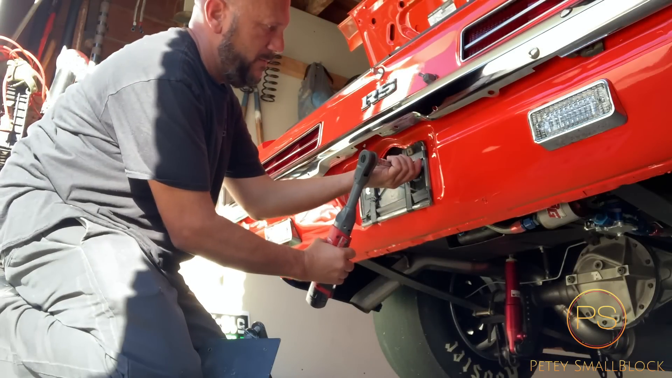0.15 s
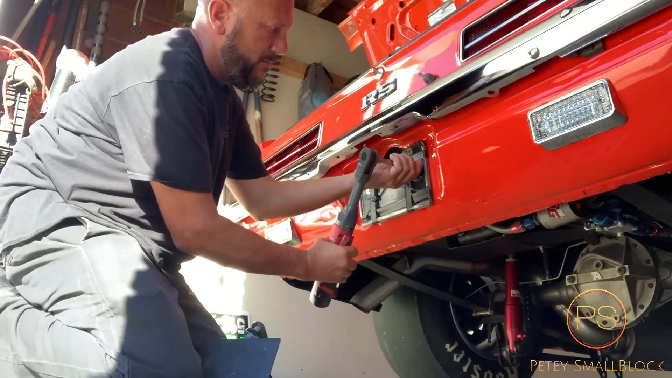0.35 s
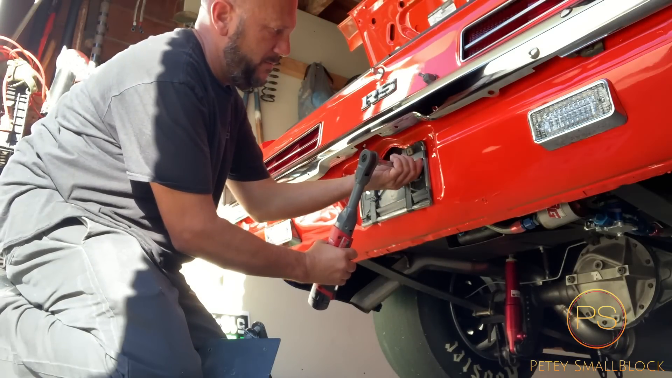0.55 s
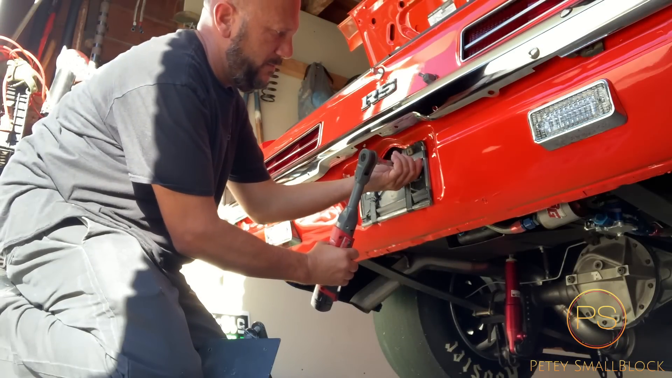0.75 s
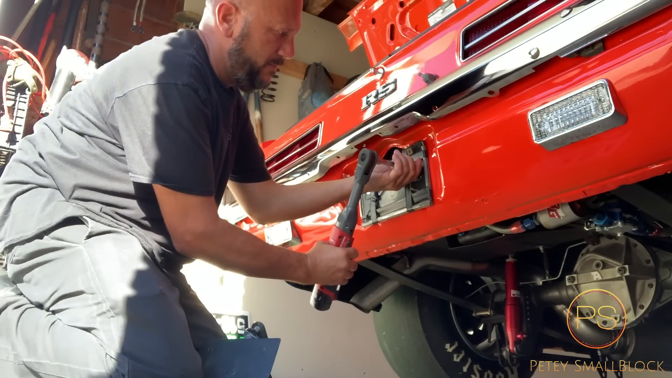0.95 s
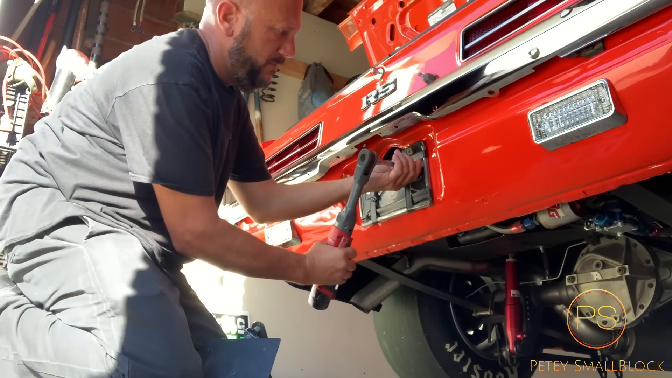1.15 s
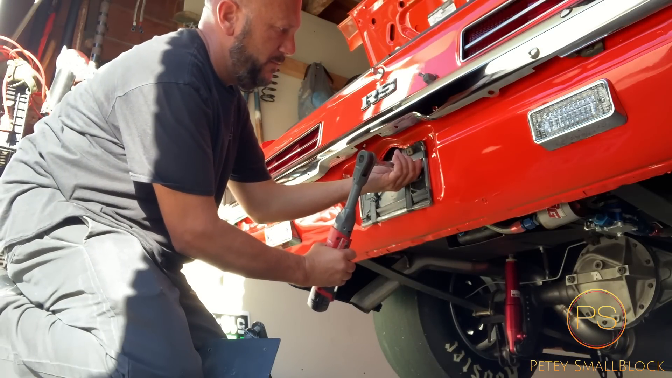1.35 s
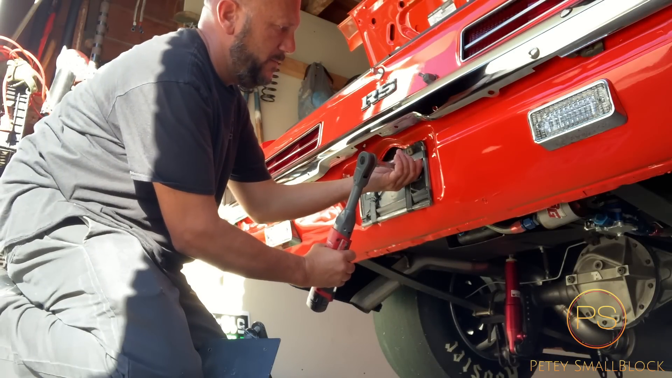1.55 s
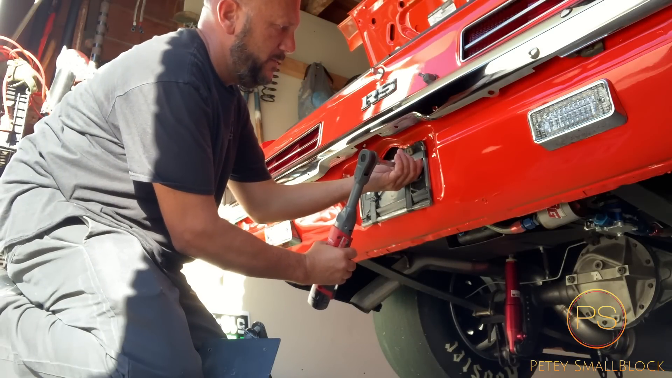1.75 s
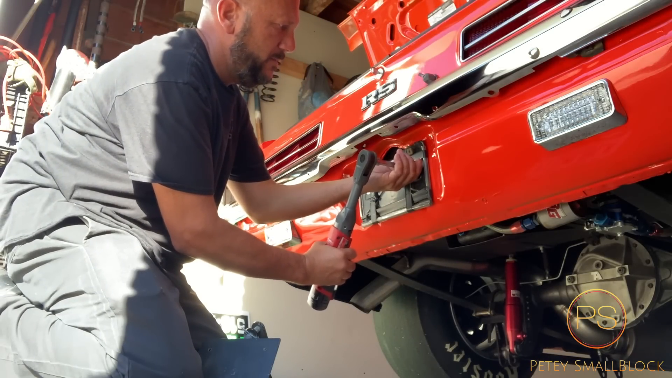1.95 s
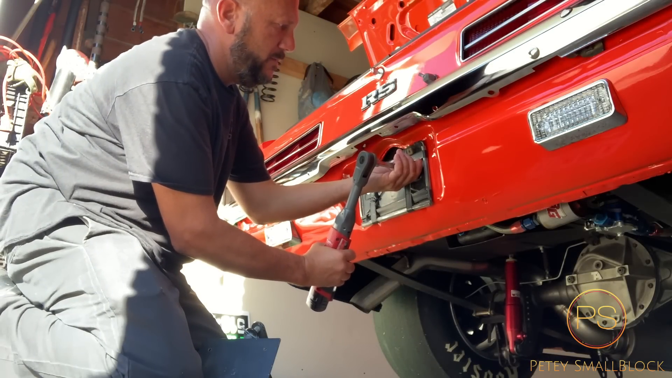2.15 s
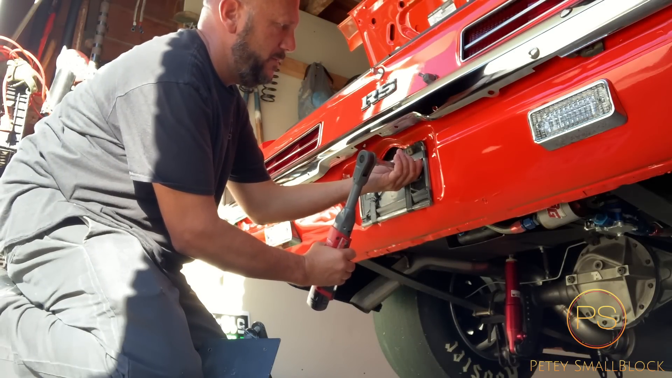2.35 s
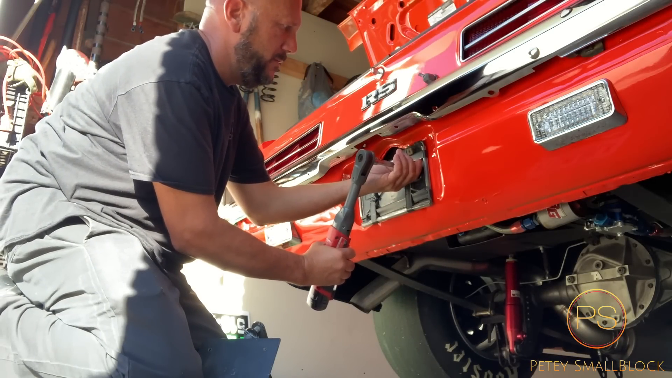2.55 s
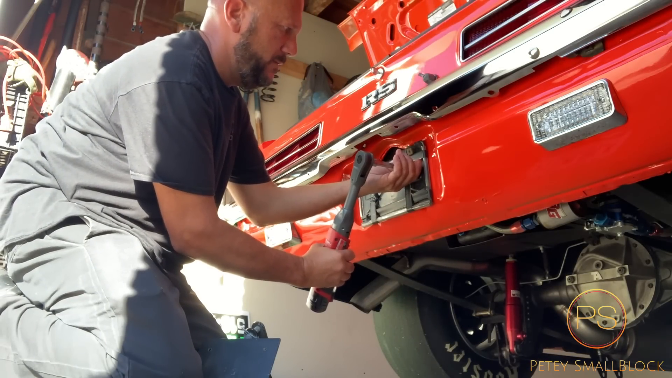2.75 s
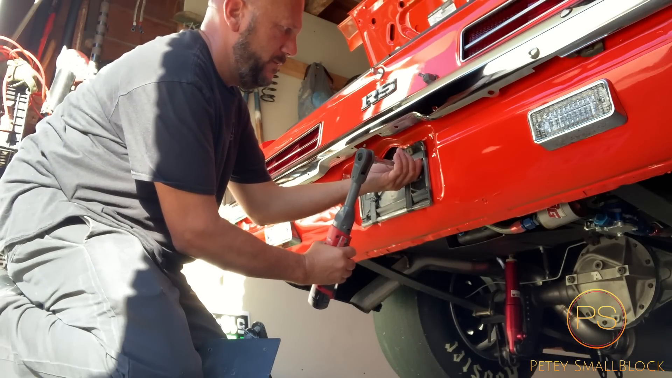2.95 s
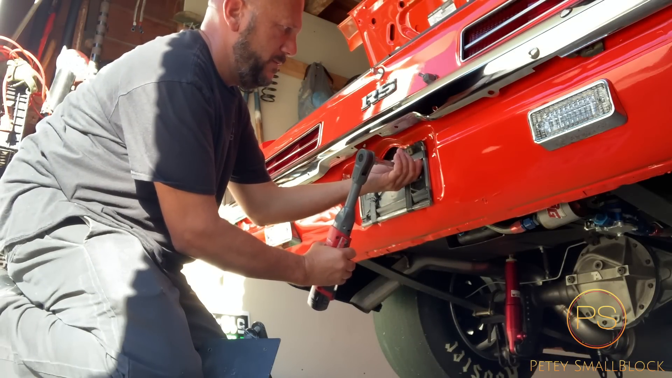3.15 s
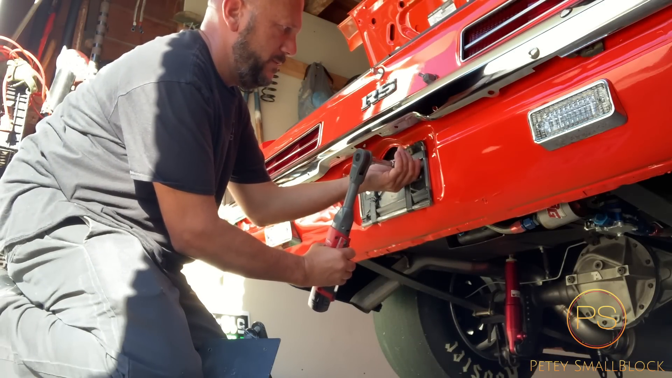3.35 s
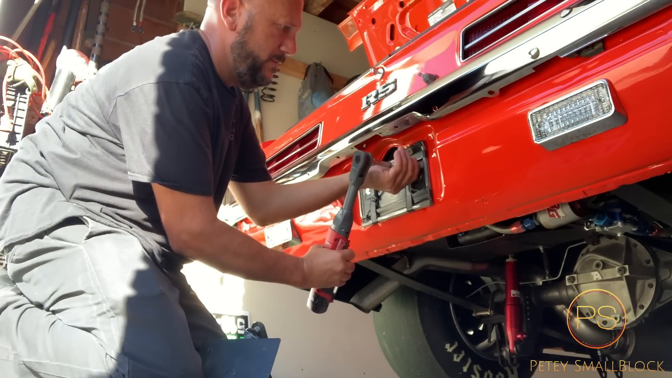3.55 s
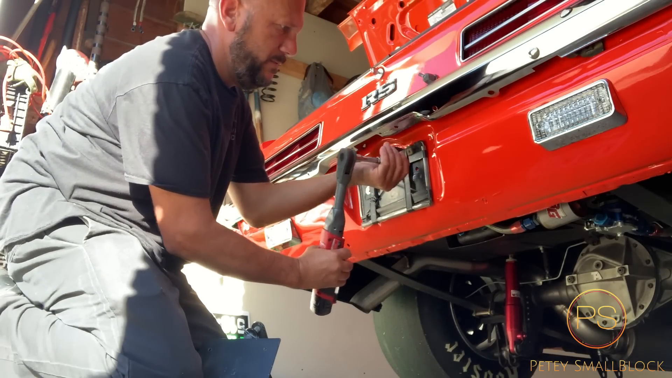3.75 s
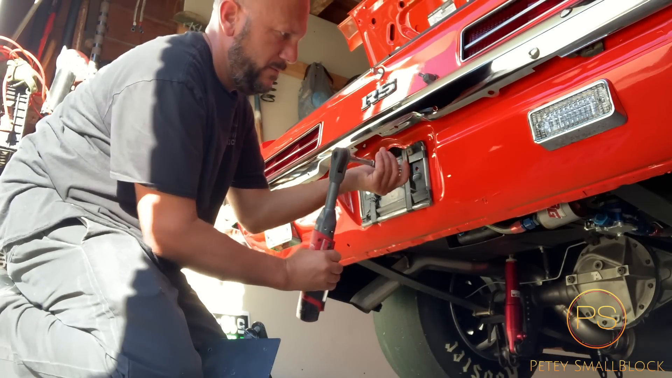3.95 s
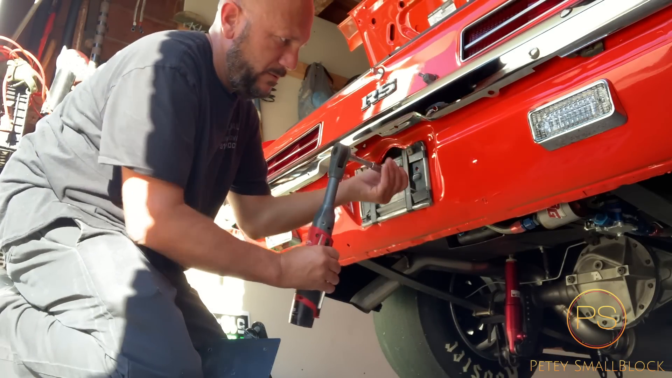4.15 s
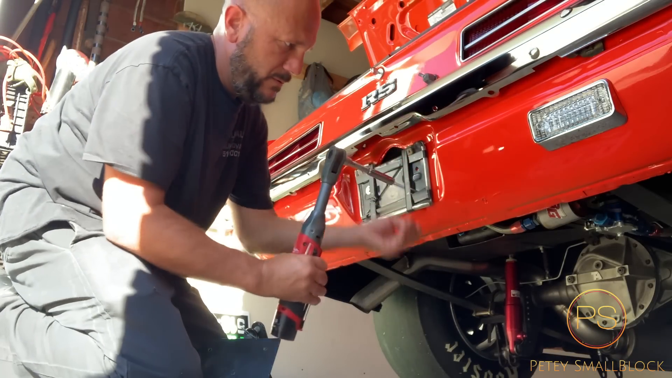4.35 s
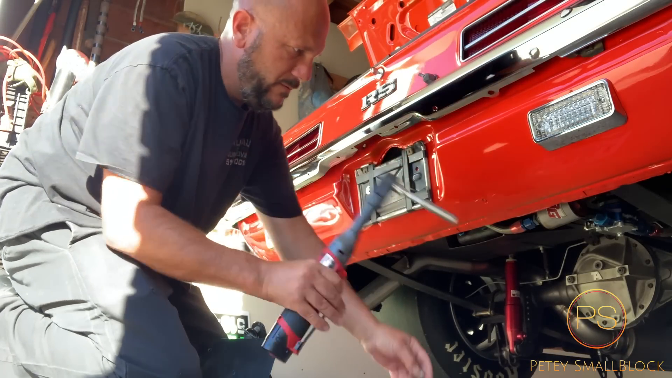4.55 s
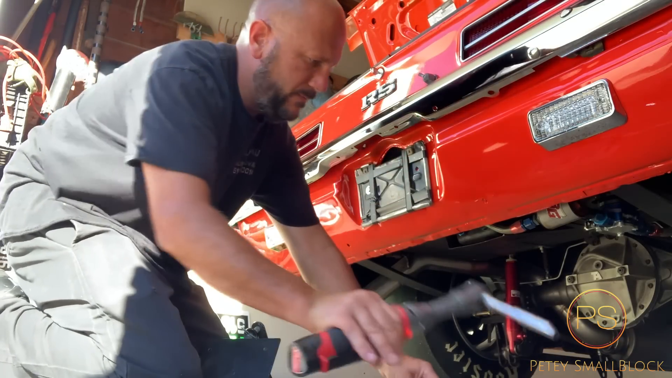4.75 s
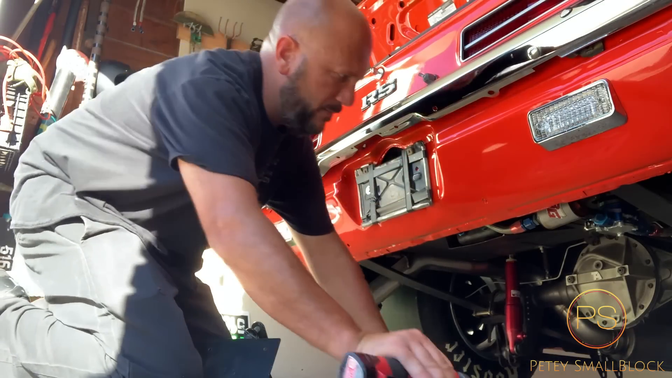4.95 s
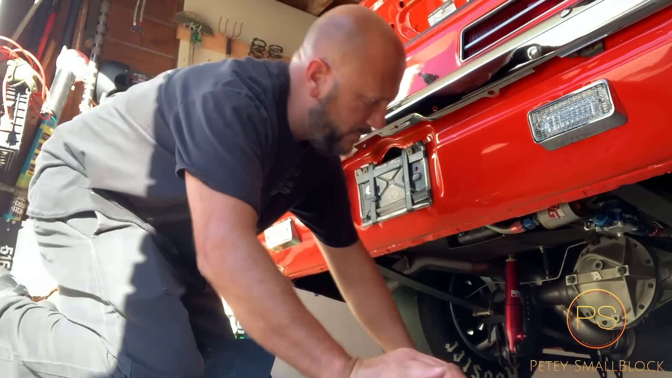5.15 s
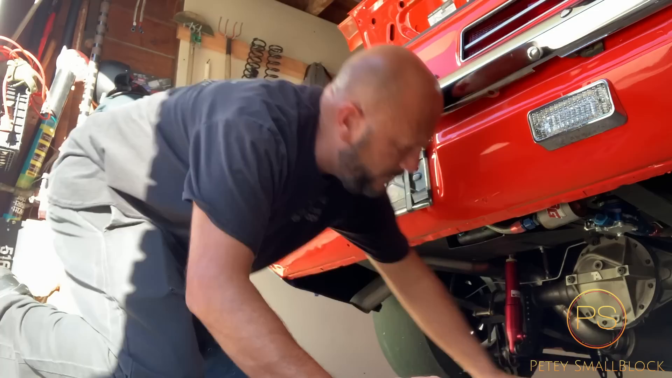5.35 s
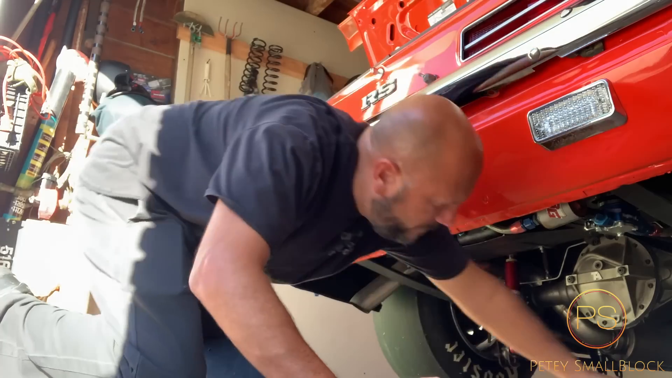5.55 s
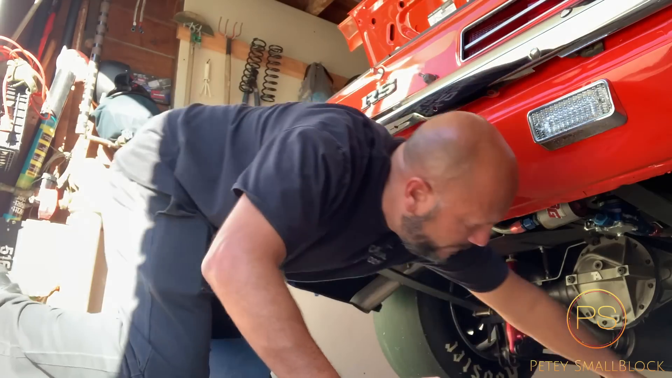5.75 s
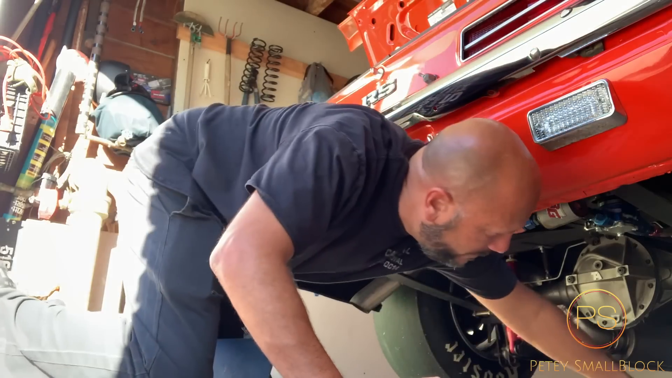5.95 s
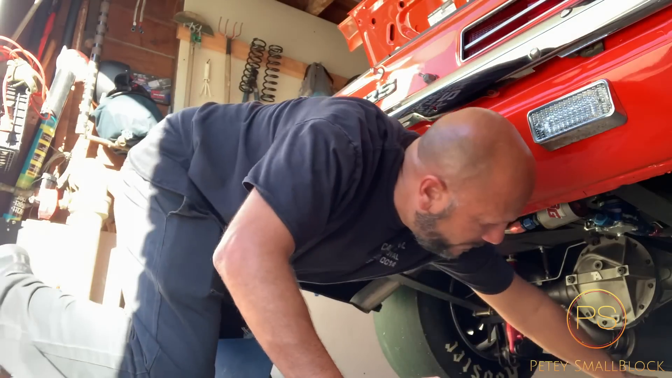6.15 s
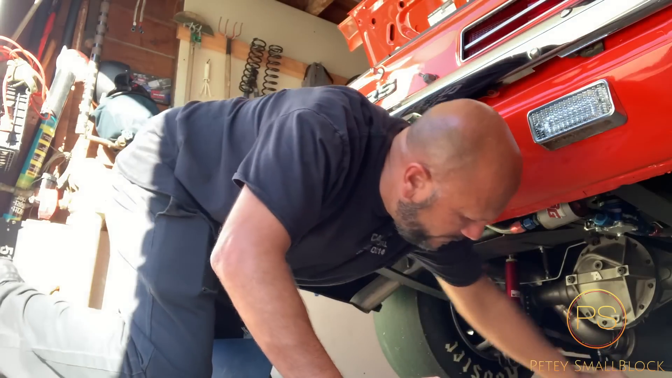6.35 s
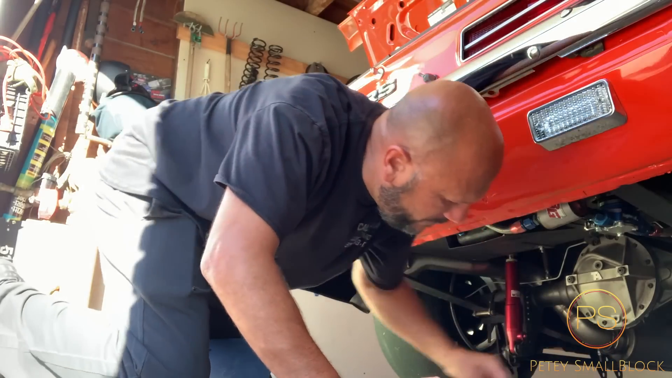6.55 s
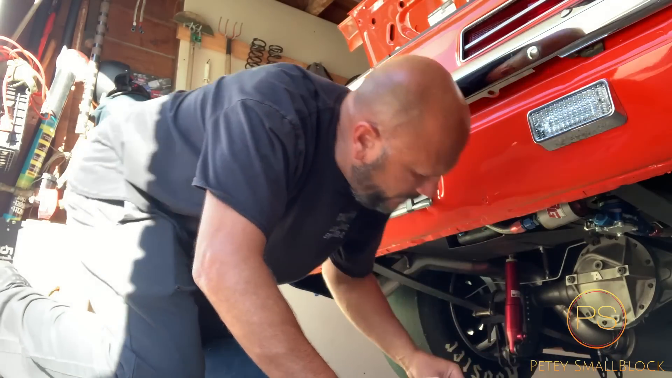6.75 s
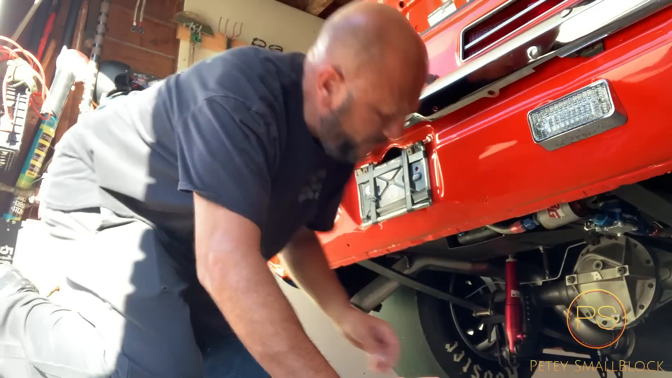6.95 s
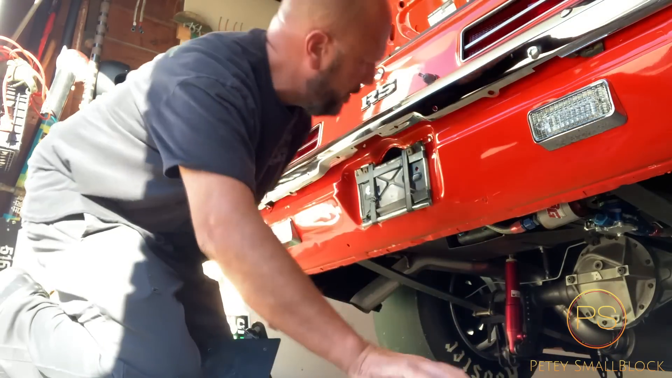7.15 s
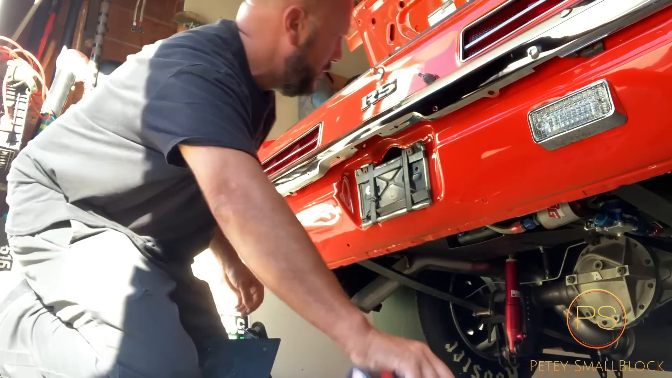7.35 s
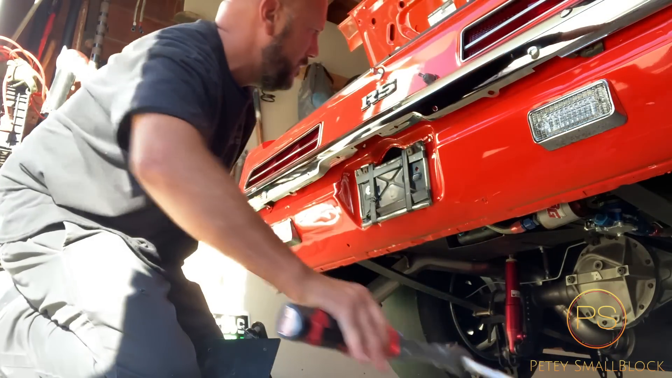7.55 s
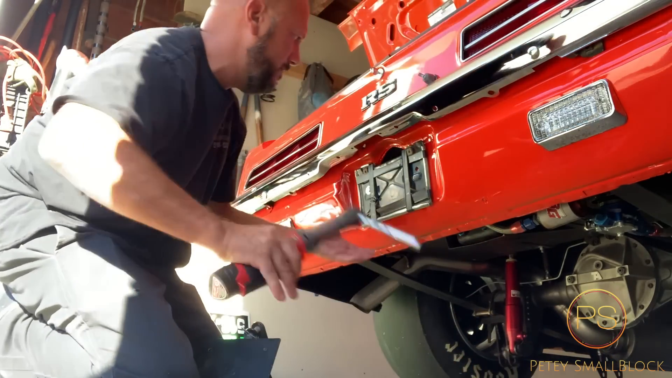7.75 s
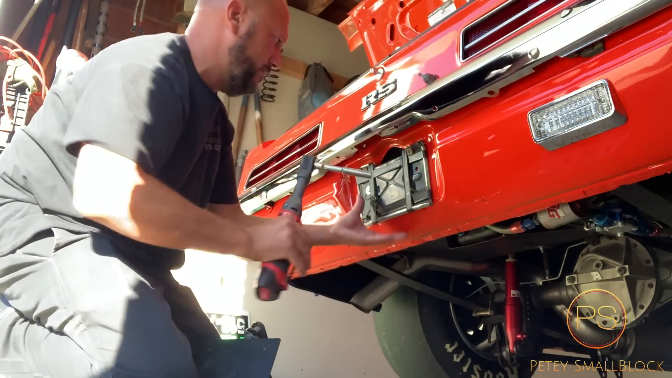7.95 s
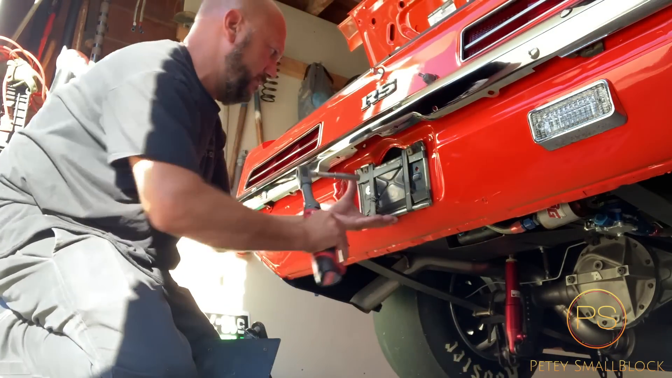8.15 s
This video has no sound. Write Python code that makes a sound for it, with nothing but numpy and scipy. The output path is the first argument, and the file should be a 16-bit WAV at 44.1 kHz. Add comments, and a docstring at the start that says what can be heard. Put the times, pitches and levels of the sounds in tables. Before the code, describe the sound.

Close up in an open garage, a cordless ratchet already runs at a steady pitch, its gears whining and hissing, pawl clicking fast, sheet metal humming in about three to four pulses a second. It stops abruptly with small clicks. After a quiet gap the tool clatters onto concrete, cloth rustles, and it is picked up with light clinks. Soft traffic rumbles outside and an engine slowly draws near. Stereo microphone nearby.

```python
"""At an open garage, two microphone ports a few centimetres apart. First a cordless ratchet spins a bolt out of
a truck's sheet-metal rear: gears whine and hiss, the pawl clicks, the panel hums and knocks at each bind.
At about 3.5 s it stops; then tool, socket and bolt are set down and picked up (ringing modes and noise bursts),
and cloth rustles in soft grains of noise. Traffic hums outside throughout, as coloured noise; from about 5 s
an engine, made of harmonics of its firing rate, draws near."""
import sys
import numpy as np
from scipy import signal
from scipy.fft import rfft, irfft, next_fast_len
from scipy.io import wavfile
from scipy.ndimage import uniform_filter1d, map_coordinates

SR = 44100
rng = np.random.default_rng(int(sys.argv[2]) if len(sys.argv) > 2 else 0)


def undo_db(level):
    """Turn decibels back into plain size, where 20 dB means ten times bigger."""
    steps = np.asarray(level, float) / 20
    return 10 ** steps


def int16_out(signal):
    """Quantize to a 16-bit WAV file."""
    q = np.round(np.clip(np.atleast_2d(signal).T, -1, 1) * 32767)
    wavfile.write(sys.argv[1], SR, q.astype(np.int16))


N = 365588
TIME_S = np.arange(N) / SR


def unit(x):
    """Bring to rms 1."""
    return x / np.sqrt(np.mean(x ** 2) + 1e-20)


def along(points, hz):
    """Columns of (Hz, value, ..) points on a log axis."""
    f, *cols = np.transpose(points)
    return [np.interp(np.log(hz + 1), np.log(f + 1), c) for c in cols]


def curves(rows):
    """One value per sample for each column after the time."""
    s, *cols = np.transpose(rows)
    return [np.interp(TIME_S, s, c) for c in cols]


def wobble(rate):
    """A smooth random curve, rate knots a second."""
    knots = rng.standard_normal(int(N * rate / SR) + 4)
    return map_coordinates(knots, [np.arange(N) * rate / SR])


def filtered(x, response):
    """x times a complex response of frequency."""
    m = next_fast_len(N + 8192)
    return irfft(rfft(x, m) * response(np.fft.rfftfreq(m, 1 / SR)), m)[..., :N]


def resonant(modes):
    """Causal response of (Hz, width, dB) resonances, alternating in sign."""
    def response(f):
        return sum((-1) ** k * undo_db(db) * 1j * f * w / (c * c - f * f + 1j * f * w)
                   for k, (c, w, db) in enumerate(modes))
    return response


def grit(gate, modes):
    """Gated noise through resonances, as rough contact excites a body; rms 1."""
    return unit(filtered(unit(gate) * rng.standard_normal((2, N)), resonant(modes)))


def noise(spectrum):
    """Two unrelated coloured noises of rms 1."""
    return unit(filtered(rng.standard_normal((2, N)), lambda hz: undo_db(along(spectrum, hz)[0])))


def patchy(pair, patchy_db):
    """Random patches of gain over time and frequency."""
    z = signal.stft(pair, nperseg=1024)[2]
    field = uniform_filter1d(rng.standard_normal(z.shape[1:]), size=4, axis=0)
    field = uniform_filter1d(field, size=8, axis=1)
    return unit(signal.istft(z * undo_db(patchy_db * unit(field)), nperseg=1024)[1][:, :N])


def rings(events, modes):
    """Every (s, dB) event rings the (Hz, dB, t60) modes as decaying sines."""
    out, t = np.zeros(N + SR), np.arange(SR // 6) / SR
    for s, db in events:
        ring = sum(undo_db(db + level + SCATTER_DB * rng.normal() - 60 * t / t60) * np.sin(2 * np.pi * hz * t)
                   for hz, level, t60 in modes)
        out[round(s * SR):][:len(t)] += ring * (1 - np.exp(-t / 0.0013))
    return out[:N]


def ports(pair, table):
    """Two unrelated versions of a sound become left and right with the given likeness, lead and balance."""
    def mix(hz):
        alike, lead, db = along(table, hz)
        alike = np.clip(alike, 0, 1)
        left = undo_db(db / 2) * np.exp(-1j * lead)
        return np.array([left, undo_db(-db / 2) * alike, undo_db(-db / 2) * np.sqrt(1 - alike ** 2)])
    left, shared, own = filtered(pair[[0, 0, 1]], mix)
    return np.array([left, shared + own])


# how long the garage rings: pitch_hz [Hz], t60_s [s]
GARAGE = [(200, 0.94), (2000, 0.28), (10000, 0.33), (15000, 0.2)]


def garage(x):
    """Each frequency of the garage's answer dies at its own speed."""
    hz, t, z = signal.stft(rng.standard_normal((2, SR // 2)), SR, nperseg=256)
    t60 = along(GARAGE, hz)[0][:, None]
    tail = signal.istft(z * undo_db(-60 * t / t60), SR, nperseg=256)[1]
    late = np.pad(x, (300, 0))[None]  # delay in samples
    return signal.fftconvolve(late, tail / np.linalg.norm(tail[0]), axes=1)[:, :N]


# rumble outside the open garage: time_s [s], level_db [dB]
STREET = [(0, -41.5), (.3, -42.5), (1.36, -49.5), (1.7, -43.5), (2.15, -42.5), (2.8, -42.5), (3.05, -50.5),
          (3.85, -48.5), (4.6, -46.5), (6.1, -45.5), (6.45, -44.5), (6.8, -43.5), (7.73, -45),
          (8.29, -38.5)]
# tyre hiss outside: time_s [s], level_db [relative dB]
TYRES = [(3.6, -53.5), (3.69, -56.5), (3.9, -57.5), (5.4, -51), (5.54, -52), (7.1, -50), (7.24, -49),
         (7.75, -50), (8.29, -45.5)]
# colours of rumble and tyre hiss: pitch_hz [Hz], level_db [relative dB per Hz]
RUMBLE = [(15, -51.5), (25, -18), (70, -1.5), (173, -11), (200, -15.5), (234, -13), (300, -28.5),
          (390, -56), (660, -120)]
ROAD = [(120, -24.5), (200, -6), (463, -6), (663, -9), (787, -6.5), (1760, -17.5), (2440, -20.5),
        (4680, -36.5), (7690, -47.5), (8970, -63), (12000, -58.5), (15600, -73), (22000, -120)]
# the ports as the street reaches them: pitch_hz [Hz], likeness [0-1], right_lead_rad [rad],
# left_minus_right_db [dB]
STREET_PORTS = [(59.9, 1, -0.9, -1.5), (192, 0.1, 0.5, 2.5), (574, 0.63, -3, 2.5), (1340, 0.06, -2.5, 0),
                (2500, 0.4, -5.5, 2.5), (4800, 0.02, -5, 0.5), (9200, 0.7, -6.5, 0), (13000, .9, -2.5, 0.5)]


def traffic():
    """Rumble and tyre hiss from outside: coloured noise that swells slowly."""
    rumble = undo_db(curves(STREET)[0] + 1.7 * wobble(4.4)) * noise(RUMBLE)
    tyres_db = curves(TYRES)[0] + 3 + 1.1 * wobble(3.2)
    tyres = undo_db(tyres_db) * patchy(noise(ROAD), patchy_db=2.2)
    return ports(rumble + tyres, STREET_PORTS)


# the engine that draws near: time_s [s], firing_hz [Hz], level_db [relative dB]
ENGINE = [(5.5, 98.47, -55), (5.58, 101.4, -57), (5.72, 103.4, -51), (5.81, 98.45, -56),
          (5.96, 103.4, -52.5), (6.57, 109.8, -50), (6.68, 110.5, -52.5), (7.16, 111.5, -50.5),
          (8.29, 116.6, -44)]
# its exhaust note: multiple [of the firing rate], level_db [relative dB]
EXHAUST = [(.5, -1.5), (1, 1), (1.5, -6.5), (2, -17)]
ENGINE_WAVER_DB = 2.2


def engine():
    """Firing makes harmonics that waver; a faint resonant whirr joins them, heard only close by."""
    hz, db = curves(ENGINE)
    turn = 2 * np.pi * np.cumsum(hz) / SR
    rise = np.clip(TIME_S - ENGINE[0][0] + 1, 0, 1)
    exhaust = sum(undo_db(db + level + 4.5 + ENGINE_WAVER_DB * wobble(12)) * np.sin(k * turn + 0.23 * wobble(6.7))
                  for k, level in EXHAUST)
    belt = undo_db(-73.5 + 200 * np.clip(TIME_S - 7.9, -.3, 0)) * grit(1, [(4250, 70, 0)])
    return rise * exhaust + ports(rise * belt, STREET_PORTS)


# cloth and shoes, each rub swelling and fading: middle_s [s], half_length_s [s], level_db [dB]
RUSTLE = [(3.634, 0.025, -57.5), (4.135, .03, -76), (4.257, 0.049, -68), (4.415, 0.081, -77),
          (5.05, 0.062, -67), (5.173, 0.067, -61.5), (5.235, 0.021, -41), (5.304, 0.03, -49.5),
          (5.473, 0.063, -63), (5.6, .07, -73.5), (5.71, 0.036, -67), (5.886, 0.048, -74),
          (6.02, 0.032, -76), (6.263, 0.11, -67), (6.778, .07, -74.5), (7.087, 0.028, -55),
          (7.233, 0.11, -61.5), (7.49, 0.045, -66), (7.587, .04, -75), (7.869, 0.035, -70), (8.12, .1, -79),
          (8.27, .03, -71)]
# colour of the rubbing: pitch_hz [Hz], level_db [relative dB per Hz]
CLOTH = [(800, -33), (3000, 2.5), (6500, -1), (9000, -4), (11000, -8), (15500, -8.5), (16500, -26)]
STIR_DB = -90  # faint stirring between the rubs


def rustle():
    """Cloth rubs in clumps of tiny grains, reaching the ports as the tool does."""
    rubs = undo_db(STIR_DB) + sum(undo_db(db) * np.exp(-((TIME_S - s) / half) ** 2) for s, half, db in RUSTLE)
    grains = unit(undo_db(2.3 * wobble(200)) * noise(CLOTH))
    return ports(rubs * grains, TOOL_PORTS)


# hands at work: start_s [s], level_db [dB], housing_knock_db [relative dB], brightest_ring_hz [Hz],
# ring_db [relative dB]
HITS = [(3.6002, -58, -20, 14300, 11), (3.6155, -52, -4, 11300, -5), (3.636, -47, -1, 14300, -1),
        (3.645, -55, -5, 14300, 4), (4.2498, -50, -8, 5950, -9), (4.857, -59, -15, 5800, 0),
        (4.985, -42, -9, 11300, -14), (4.997, -43, -7, 7260, -3), (5.021, -51, -8, 11300, 14),
        (5.029, -53.5, -6.5, 11300, 12), (5.036, -56, -6, 11300, 12), (5.073, -48, -1, 6250, -1),
        (5.1148, -45, -8, 14300, 9), (5.159, -51, -1, 6370, -4), (5.205, -44, -12, 6900, 6),
        (5.21, -36, -12, 6900, 2), (5.2136, -18.5, -9.5, 6400, 10), (5.2184, -15.5, -5.5, 6330, 0),
        (5.2251, -24, 1, 11300, 4), (5.2595, -27.5, -6.5, 11300, -4), (5.2338, -32.5, 3, 6900, 3),
        (5.264, -30.5, 1, 6900, -8), (5.2696, -28.5, -2, 6900, 9), (5.275, -32.5, -0.5, 11300, 6),
        (5.303, -36.5, -0.5, 6900, 0), (5.2831, -21, -14, 6330, -5), (5.2883, -29, -3.5, 6900, 7),
        (5.2922, -35, 4, 11300, 12), (5.3311, -41, -7, 5260, -27), (5.401, -46, -7, 5090, -6),
        (5.414, -35, -5, 13950, -3), (5.46, -52, -23, 14400, 18), (5.4884, -53, -17.5, 11300, 13),
        (5.68, -52, 3, 14300, 6), (6.292, -41.5, -14, 11360, -7), (7.0633, -41, -12, 6120, 6),
        (7.0806, -44, 3.5, 6450, -8), (7.0894, -44, 1, 6070, 0), (7.1012, -38, -8, 5130, -11),
        (7.12, -34, -3, 6900, 5), (7.11, -45.5, -10, 11300, 12), (7.174, -29, -5, 6490, 1),
        (7.187, -38, -8, 6155, -12), (7.326, -44, -2.5, 11360, -2), (7.4513, -54, -5, 14300, -8),
        (7.4936, -50, -5, 6920, -3), (7.598, -46, -17.5, 5290, -10)]
# the tool's housing and the floor under it: pitch_hz [Hz], level_db [relative dB], t60_s [s]
BODY = [(81, 2.5, 0.061), (273, 5.5, 0.045), (480, -3, 0.013), (865, 1, 0.051), (1292, 3, 0.068),
        (1762, 0, 0.052), (1913, 0, 0.052), (2154, 2, 0.033), (2660, -3, 0.036)]
# the socket's modes: pitch_hz [Hz], level_db [relative dB], t60_s [s]
STEEL = [(5800, -15, .02), (6900, -9, .03), (9100, -12, .02), (11300, -8, .03), (14300, -11, .03)]
SCATTER_DB, SHAKE_DB = 2.5, 2  # mode levels from contact to contact, lumps in a ring
# treble in the rattle for a 6 kHz ring (relative dB); brighter rings rattle brighter
TREBLE_DB, TREBLE_DB_PER_OCTAVE = -45, 1
CRACK_TREBLE_DB = -14  # relative; the first crack is bright
RATTLE_S = .03  # t60 of the loose parts' rattle


def contacts():
    """Each contact cracks, rings the socket's modes near its brightest pitch and knocks the housing."""
    out, t = np.zeros((2, N + SR)), np.arange(SR // 6) / SR
    luck = rng.standard_normal((len(HITS), 2, 2, len(BODY) + len(STEEL)))  # hit, size or phase, port, mode
    hz, level, t60 = np.transpose(BODY + STEEL)[..., None]
    is_body = np.arange(len(hz))[:, None] < len(BODY)
    lowpass = signal.butter(2, 7000, fs=SR, output="sos")
    for (s, db, knock_db, bright_hz, ring_db), (size, phase) in zip(HITS, luck):
        near_db = -32 * np.abs(np.log2(hz / bright_hz))
        struck_db = level + np.where(is_body, knock_db - 8.0, near_db + ring_db)
        # loose parts blur each ring, which comes in lumps
        chatter = 1e-5 * hz * np.cumsum(rng.standard_normal((len(hz), len(t))), axis=1)
        shake_db = SHAKE_DB * np.interp(t, np.linspace(0, t[-1], num=50), rng.standard_normal(50))
        ring_db_now = struck_db + SCATTER_DB * size[..., None] + shake_db - 60 * t / t60
        ring = undo_db(ring_db_now) * np.sin(2 * np.pi * hz * t + 1.57 * phase[..., None] + chatter)
        white = rng.standard_normal((2, len(t) + 1))
        dull, treble = signal.sosfilt(lowpass, white[:, 1:]), np.diff(white)
        crack = undo_db(-11.0 - 60 * t / 0.0057) * (dull + undo_db(CRACK_TREBLE_DB) * treble)
        treble_db = TREBLE_DB + TREBLE_DB_PER_OCTAVE * np.log2(bright_hz / 6000)
        rattle = undo_db(-1.0 + shake_db - 60 * t / RATTLE_S) * (dull + undo_db(treble_db) * treble)
        hit = ring.sum(1) * (1 - np.exp(-t / 0.00051)) + (crack + rattle) * (1 - np.exp(-t / 0.00074))
        out[:, round(s * SR):][:, :len(t)] += undo_db(db) * hit
    return out[:, :N]


# steel dragged over concrete: start_s [s], length_s [s], level_db [dB]
SLIDES = [(5.46, 0.35, -74), (7.373, .08, -69.5)]


def slides():
    """Uneven friction noise rings the dragged steel near 6.5 kHz."""
    rough = undo_db(2.9 * wobble(160)) * rng.standard_normal((2, N))
    scrape = unit(filtered(rough, resonant([(6450, 320, 0)])))
    out = np.zeros((2, N))
    for s, length, db in SLIDES:
        through = np.clip((TIME_S - s) / length, 0, 1)
        out += scrape * undo_db(db + 1.9 * wobble(19)) * np.sin(np.pi * through) ** 0.31
    return out


# the tool's weight lands on the floor: start_s [s], level_db [relative dB]
THUDS = [(5.2165, -29), (5.283, -36), (7.172, -31.5)]
# the floor's modes: pitch_hz [Hz], level_db [relative dB], t60_s [s]
FLOOR = [(71, -4, 0.12), (258, -4.5, 0.026), (850, -13, 0.054), (1290, -3, 0.053), (2100, -6, 0.019)]
# the trigger springs back: start_s [s], level_db [relative dB]
TRIGGER = [(3.611, -60), (3.6185, -46), (3.645, -50)]
# the switch's modes: pitch_hz [Hz], level_db [relative dB], t60_s [s]
SWITCH = [(760, 10, 0.02), (2300, -14, .02), (3520, -5, 0.035)]
# the ports as the hands' work reaches them: pitch_hz [Hz], likeness [0-1], right_lead_rad [rad],
# left_minus_right_db [dB]
HAND_PORTS = [(94, 1, 0, -1.5), (261, 0.3, 1, -2.5), (534, 0.3, 2, -9), (1107, 0.44, 1, 1),
              (2000, 0.8, 1, -.5), (4580, 0.4, 3, -2), (6370, 0, 5, 2), (8740, 1, 1, 0), (10200, 1, 2.5, 2),
              (12140, 0.6, -0.1, -2), (16090, .95, .5, 2)]
HAND_ROOM_DB = -18  # the garage's answer to the hands' work


def handling():
    """Contacts and slides spread over the ports; thuds and trigger reach both alike; the garage answers."""
    loose = contacts() + slides()
    solid = rings(THUDS, FLOOR) + rings(TRIGGER, SWITCH)
    return ports(loose + undo_db(HAND_ROOM_DB) * garage(loose[0] + solid), HAND_PORTS) + solid


# the thread binds once a turn: middle_s [s], panel_swell_db [dB], pawl_swell_db [dB]
BINDS = [(.14, 5.5, 4), (.41, 4.5, 9.5), (.67, 6, 1), (1.021, 11.5, 9), (1.3, 12, 2), (1.58, 10.5, 6.5),
         (1.87, 8, 7.5), (2.16, 10, 6), (2.45, 11, 6), (2.74, 7.5, 4.5), (3.019, 8.5, 4.5), (3.279, 0.5, 6)]
SWELL_S, PAWL_EARLY_S, SAG_S, SAG_LATE_S = 0.087, 0.04, .055, 0.017  # half lengths and shifts about a bind


def binds(late_s, half_s):
    """A smooth bump at each bind, one row a bind."""
    middle_s = np.transpose(BINDS)[0][:, None]
    return np.exp(-((TIME_S - middle_s - late_s) / half_s) ** 2)


# the motor's speed: time_s [s], free_mesh_hz [Hz, between binds], sag_hz [Hz, at a bind]
SPEED = [(0, 4273, 3), (.14, 4282, 8), (.25, 4288, 8), (.55, 4295, 10), (.85, 4291, 11), (1.5, 4295, 14),
         (1.7, 4290, 17), (2.0, 4283, 9), (2.6, 4289, 10), (3.0, 4290, 6), (3.6, 4288, 4)]


def mesh_pitch():
    """Gear mesh frequency in Hz: it sags under load at each bind and wavers a little."""
    free_hz, sag_hz = curves(SPEED)
    return free_hz - sag_hz * binds(SAG_LATE_S, SAG_S).sum(0) + 1.1 * wobble(12)


STOP_S, STOP_DB_PER_S, STOP_TAKES_S = 3.4446, 599.5, 0.09  # trigger released; mean fall over the stop


def running():
    """Gain of the tool: its level falls ever faster once the trigger is released."""
    since_s = np.clip(TIME_S - STOP_S, 0, None)
    return undo_db(-STOP_DB_PER_S * since_s ** 2 / STOP_TAKES_S) * (TIME_S < STOP_S + STOP_TAKES_S)


TEETH = 57  # gear mesh cycles per pawl stroke
CONTACT_SLOP = .05  # contacts come early or late (strokes)


def bursts(stroke, mesh_hz, place, decay_ms, scatter_db):
    """A decaying gate once a stroke, each of a new size."""
    since = stroke - place + 1 + CONTACT_SLOP * wobble(25)
    size = undo_db(scatter_db * rng.standard_normal(int(since[-1]) + 3))[since.astype(int)]
    since_ms = (since % 1) * TEETH / mesh_hz * 1000
    return size * np.exp(-since_ms / decay_ms)


# contacts in each stroke: place [0-1 of the stroke], ring_hz [Hz], width_hz [Hz], decay_ms [ms],
# level_db [relative dB]
CONTACTS = [(0.2, 9900, 420, 2.8, -7), (.95, 14000, 2400, .9, -3), (0, 11000, 330, 0.9, -8.5),
            (0.5, 14000, 2000, .8, -5), (0.2, 13500, 2500, .8, -8), (.5, 2300, 1600, 3.4, -9.5),
            (0.1, 8000, 9500, 0.74, -7.5)]
CONTACT_SCATTER_DB = 4  # size from stroke to stroke
# colour of the gear hiss: pitch_hz [Hz], level_db [relative dB per Hz]
GEARS = [(100, -26.5), (300, -9), (1000, -8.5), (1500, -7), (2600, -5.5), (5000, -2.5), (7500, -6.5),
         (10000, 1), (12500, -7), (14000, -2), (15500, -17), (16500, -36)]
# the housing's resonances: pitch_hz [Hz], width_hz [Hz], level_db [relative dB]
HOUSING = [(2047, 170, 4), (2980, 320, 1.5), (3680, 550, -1.5), (3900, 40, -3)]
# loose play in head and socket: pitch_hz [Hz], width_hz [Hz], level_db [relative dB]
PLAY = [(900, 660, -1.5), (2100, 900, -5), (3120, 700, 0), (4270, 900, 1.5), (5800, 1700, -1.5)]
PLAY_PER_S, PLAY_SPREAD_DB, PLAY_MS, PLAY_DB = 600, 3.5, 0.91, -2.5  # at uneven moments


def gears(stroke, mesh_hz, panel_over_hiss_db):
    """Meshing teeth hiss, the housing resonates, each contact bursts in its resonance, loose play rattles."""
    out = undo_db(8.0) * patchy(noise(GEARS), patchy_db=2.0)
    out += undo_db(0.22 * panel_over_hiss_db) * grit(1, HOUSING)
    for place, hz, width, decay_ms, db in CONTACTS:
        gate = bursts(stroke, mesh_hz, place, decay_ms, CONTACT_SCATTER_DB)
        out += undo_db(db) * grit(gate, [(hz, width, 0)])
    ticks = (rng.random(N) < PLAY_PER_S / SR) * undo_db(PLAY_SPREAD_DB * rng.standard_normal(N))
    play_gate = signal.lfilter([1], [1, -np.exp(-1000 / SR / PLAY_MS)], ticks)
    return out + undo_db(PLAY_DB) * grit(play_gate, PLAY)


def pawl(stroke, mesh_hz, pawl_db):
    """The pawl clicks once a stroke; the planet carrier's turn, every five strokes, makes some harder."""
    carrier_db = 3 * np.sin(2 * np.pi * 0.2 * stroke + 0.18)
    clicks = bursts(stroke, mesh_hz, 0.098, 3.7, 1.0)
    return undo_db(pawl_db + carrier_db - 3.0) * grit(clicks, [(8430, 2200, -10.0), (10180, 1100, 2.0)])


# the sheet-metal panel's resonances: pitch_hz [Hz], width_hz [Hz], level_db [relative dB]
PANEL = [(214.2, 250, -7.5), (392, 43, 1), (456.4, 15, 3.5), (527, 59, -3), (610, 35, 0), (667, 83, 0),
         (888, 110, -2.5), (1256, 160, -6)]
SHIVER_DB = -3.5  # the panel's noisy shiver over the panel level


def panel(stroke, mesh_hz, panel_db):
    """The panel shivers as noise in its resonances, harder once a stroke."""
    gate = 1 + 0.29 * bursts(stroke, mesh_hz, 0.93, 5.0, 5.8)
    return undo_db(panel_db + SHIVER_DB) * grit(gate, PANEL)


# the panel's steady hum: multiple [of the pawl stroke rate], left_db [relative dB], right_db [relative dB],
# right_lead_rad [rad]
HUM = [(2, -23, -13, -.6), (3, -12, -20, -1.2), (4, -12, -12, 2.5), (5, -7, 0, 1), (6, -10, -2, 2.2),
       (7, -5.5, 2, 3.1), (8, -16, 1, -2), (9, -13, -2.5, -2), (10, -8, -10, -1), (13, -12, -13, 0),
       (16, -16, -11, -2.4), (17, -12, -18, -.6)]
HUM_DB, HUM_SWELLS = -3.5, .7  # over the panel level; share of the panel's swell that the hum follows
HUM_WAVER_DB, HUM_DRIFT = 2.5, .5  # each partial wavers, its phase wanders (rad)


def hum(stroke, panel_db, swell_db):
    """The yoke's blows through socket and bolt keep the panel humming on the stroke's multiples."""
    out = np.zeros((2, N))
    for k, left_db, right_db, ahead in HUM:
        level_db = np.array([[left_db], [right_db]]) + HUM_WAVER_DB * wobble(9)
        phase = 2 * np.pi * k * stroke + HUM_DRIFT * wobble(13) + np.array([[0], [ahead]])
        out += undo_db(level_db) * np.sin(phase)
    return out * undo_db(panel_db - (1 - HUM_SWELLS) * swell_db + HUM_DB)


# standing waves favour one port or the other as the whine's pitch shifts: mesh_hz [Hz]
WHINE_HZ = [4270, 4278, 4284, 4294]
# the whine at those pitches: left_db [dB], right_db [dB], right_lead_rad [rad]
WHINE = [(-28.5, -30.5, 4.6), (-30.5, -28, 4.9), (-39.5, -26.5, 3), (-41.5, -27, 3.2)]
WHINE_FADE_S, WHINE_FADE_DB_PER_S = 3.4, 149  # the whine gives out first
LOADED_DB, LOADED_S, FLUTTER_DB = 4.5, .2, 1  # louder while the bolt breaks loose; flutters
LEAD_WAVER = .2  # rad


def whine(mesh, mesh_hz):
    """The gear mesh sounds as one sine, its level and lead at each port set by its pitch."""
    left_db, right_db, lead = [np.interp(mesh_hz, WHINE_HZ, c) for c in np.transpose(WHINE)]
    loaded_db = LOADED_DB * np.exp(-(TIME_S / LOADED_S) ** 4)
    fade_db = WHINE_FADE_DB_PER_S * np.clip(TIME_S - WHINE_FADE_S, 0, None)
    flutter_db = FLUTTER_DB * np.array([wobble(25), wobble(25)])
    level_db = np.array([left_db, right_db]) + loaded_db - fade_db + flutter_db
    return undo_db(level_db) * np.sin(2 * np.pi * mesh + [0 * lead, lead + LEAD_WAVER * wobble(11)])


# the bolt breaks loose, runs out and lets go of the panel: time_s [s], gear_hiss_db [relative dB],
# panel_db [relative dB], pawl_db [relative dB]
TOOL = [(0, -26, -19, -30.5), (.14, -28.5, -30, -27.5), (.21, -29.5, -33, -32), (.5, -29.5, -33, -29.5),
        (.72, -29.5, -36, -29.5), (.9, -30, -38.5, -35.5), (1.15, -31, -37, -28.5),
        (1.3, -30.5, -37.5, -24.5), (1.5, -31, -37, -30), (1.9, -30.5, -34, -30.5), (2.2, -30, -36.5, -29),
        (2.45, -30.5, -38.5, -29.5), (2.8, -30.5, -38.5, -28.5), (3.05, -30.5, -45, -25.5),
        (3.25, -30, -55, -27.5), (3.45, -30, -49.5, -30.5)]
# dips in the tool's roar: pitch_hz [Hz], width_hz [Hz], depth [0-1]
NOTCHES = [(2640, 78, 0.5), (3440, 58, 0.7), (4790, 38, .6), (5080, 360, .4), (5950, 130, 0.4)]
# the ports as the tool reaches them: pitch_hz [Hz], likeness [0-1], right_lead_rad [rad],
# left_minus_right_db [dB]
TOOL_PORTS = [(94.1, 1, -3.5, -17), (248, 0.6, 0.5, 3), (534, 0.4, 3.5, -12), (1080, 0, 1, 0.5),
              (2050, 1, 1, -0.5), (2870, 0.3, 2, -1), (4580, 0, 2, 0), (6370, 0, 5, 1.5),
              (8102, 1, 3.5, 1.5), (9500, 1, 3.0, -6), (10180, 0.86, 2.5, 1.5), (12000, 0.8, 1.15, 0),
              (13770, 0.98, -0.1, -6), (16090, .95, 1, 4)]


def ratchet():
    """The gear mesh sets the pawl's stroke, which times contacts, clicks and hum; binds swell pawl and panel."""
    mesh_hz = mesh_pitch()
    mesh = np.cumsum(mesh_hz) / SR
    stroke = mesh / TEETH
    _, panel_swell, pawl_swell = np.transpose(BINDS)[..., None]
    swell_db = (panel_swell * binds(0, SWELL_S)).sum(0)
    pawl_swell_db = (pawl_swell * binds(-PAWL_EARLY_S, SWELL_S)).sum(0)
    hiss_db, panel_db, pawl_db = curves(TOOL)
    hiss_db = hiss_db + .5 * wobble(10)
    panel_db = panel_db + swell_db + 0.34 * wobble(12)
    pawl_db = pawl_db + pawl_swell_db + 2.2 * wobble(12)
    roar = undo_db(hiss_db - 2.5) * gears(stroke, mesh_hz, panel_db - hiss_db)
    roar += pawl(stroke, mesh_hz, pawl_db) + panel(stroke, mesh_hz, panel_db)
    gain = running()
    roar *= gain

    def dips(f):
        return np.prod([1 - np.clip(depth, 0, .9) / (1 + ((f - hz) / width * 2) ** 2)
                        for hz, width, depth in NOTCHES], axis=0)

    heard = filtered(ports(roar + undo_db(-15.0) * garage(roar[0]), TOOL_PORTS), dips)
    return heard + gain * (whine(mesh, mesh_hz) + hum(stroke, panel_db, swell_db))


def scene():
    """Everything at the two ports."""
    return traffic() + engine() + rustle() + handling() + ratchet()


def top_cut(x):
    """Nothing passes above the cut-off."""
    return signal.sosfilt(signal.butter(12, 16230, fs=SR, output="sos"), x)


# edges of the treble bands in which mid and side are weighed: pitch_hz [Hz]
JOINT_HZ = [7500, 8270, 9650, 11000, 12400, 13100, 14500, 15800]


def record(dry):
    """Moment by moment, a treble band of mid or side much weaker than its partner, or very faint, is dropped."""
    hz, _, z = signal.stft([dry[0] + dry[1], dry[0] - dry[1]], SR, nperseg=2048)
    for lo_hz, hi_hz in zip(JOINT_HZ, JOINT_HZ[1:]):
        band = (hz >= lo_hz) & (hz < hi_hz)
        size = np.sqrt(np.mean(np.abs(z[:, band]) ** 2, 1))
        keep = (size > undo_db(-9) * size[::-1]) & (size > undo_db(-112))
        z[:, band] *= keep[:, None]
    # nothing is kept above the last edge, and the microphone loses the deepest bass
    response = (hz < JOINT_HZ[-1]) / (1 + (40 / (hz + 1)) ** 4)
    mid, side = signal.istft(z * response[:, None], SR, nperseg=2048)[1][:, :N] / 2
    return top_cut(np.array([mid + side, mid - side]))


dry = scene()
out = record(dry)
int16_out(out)
```